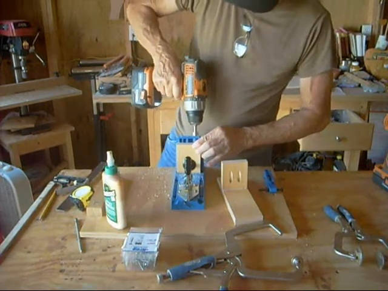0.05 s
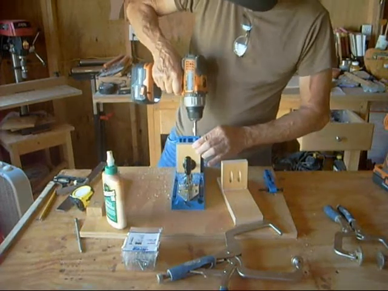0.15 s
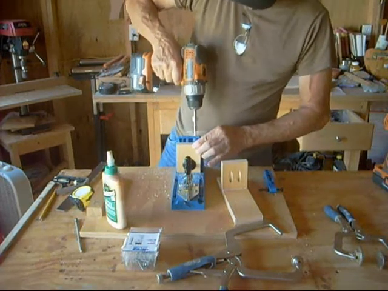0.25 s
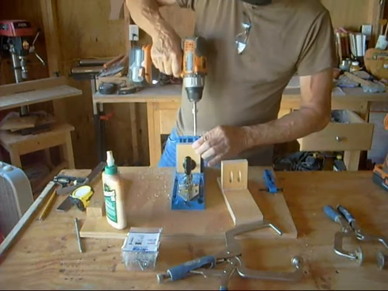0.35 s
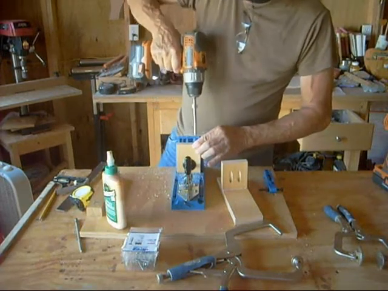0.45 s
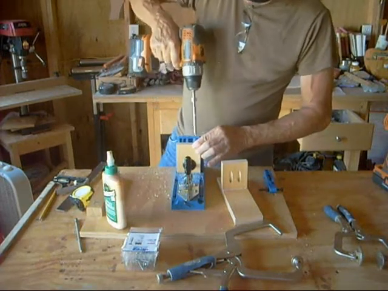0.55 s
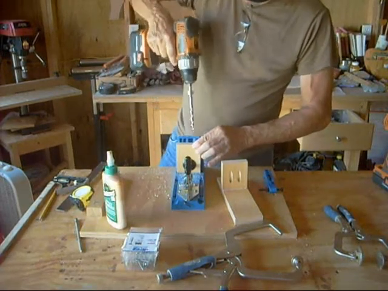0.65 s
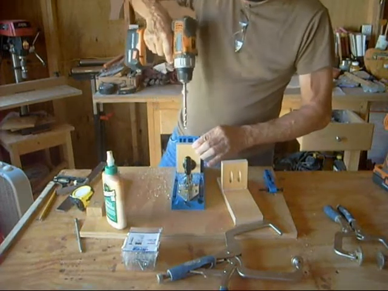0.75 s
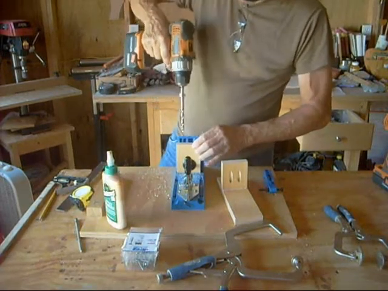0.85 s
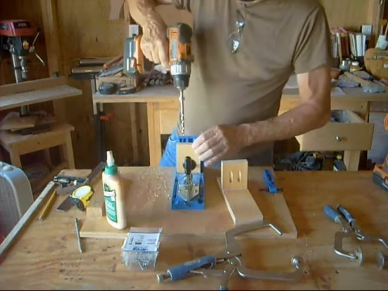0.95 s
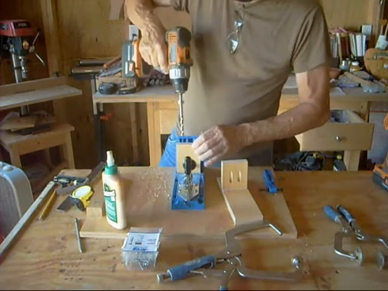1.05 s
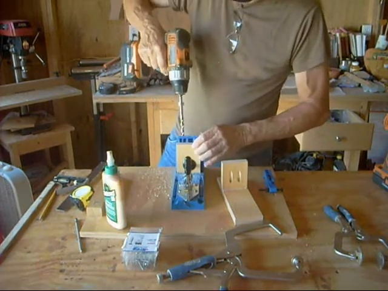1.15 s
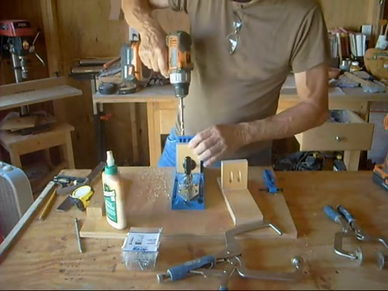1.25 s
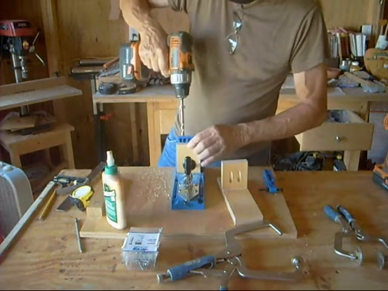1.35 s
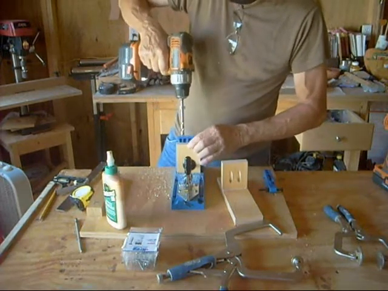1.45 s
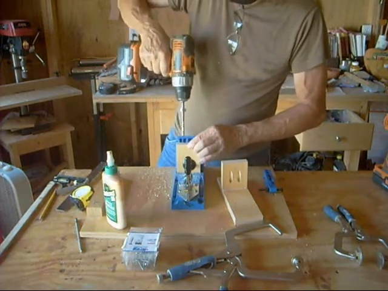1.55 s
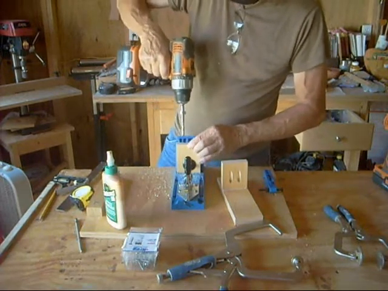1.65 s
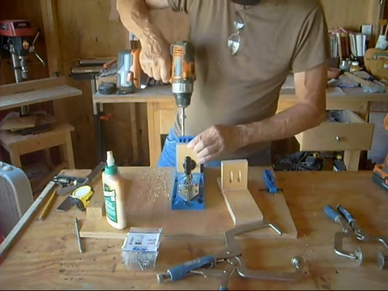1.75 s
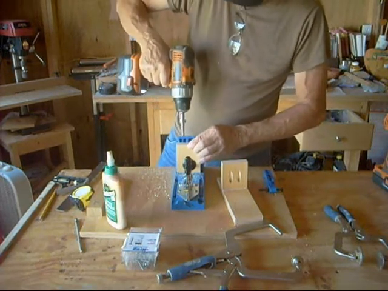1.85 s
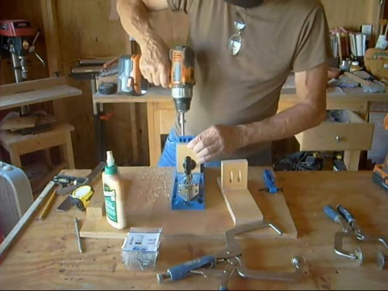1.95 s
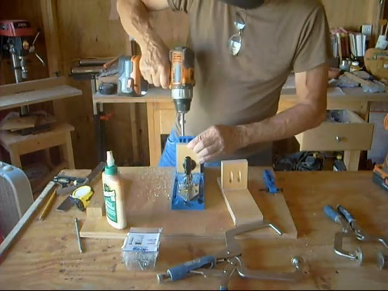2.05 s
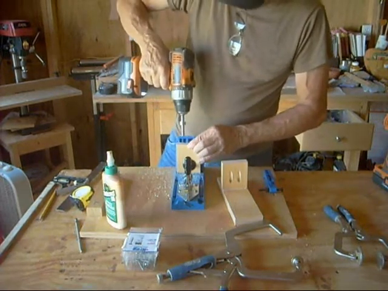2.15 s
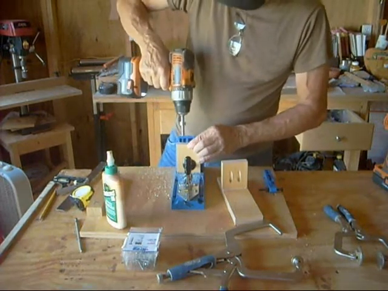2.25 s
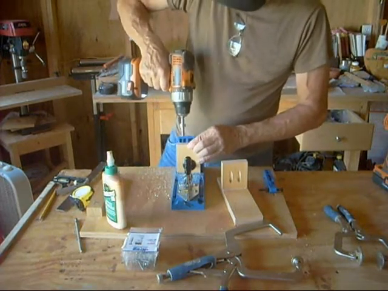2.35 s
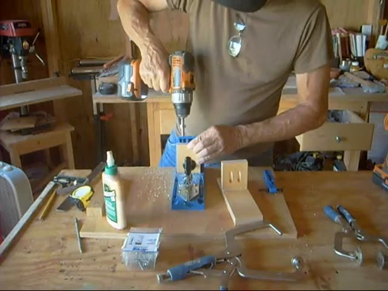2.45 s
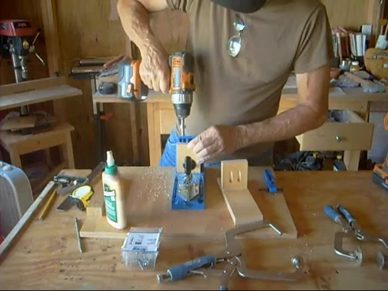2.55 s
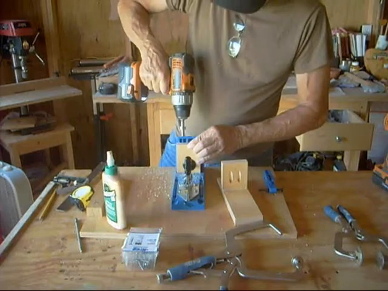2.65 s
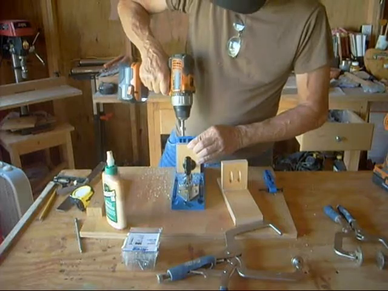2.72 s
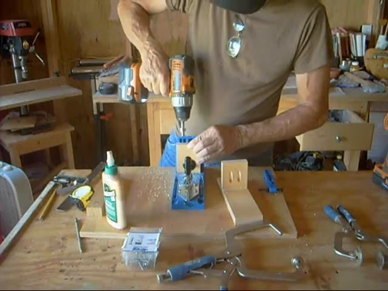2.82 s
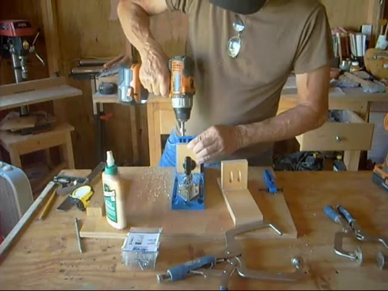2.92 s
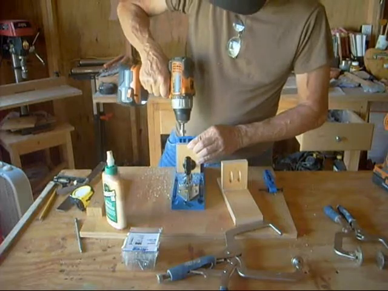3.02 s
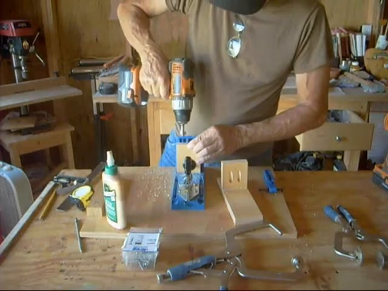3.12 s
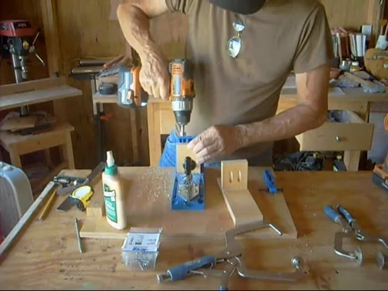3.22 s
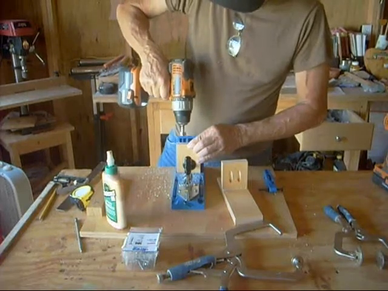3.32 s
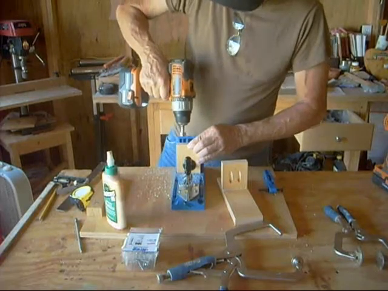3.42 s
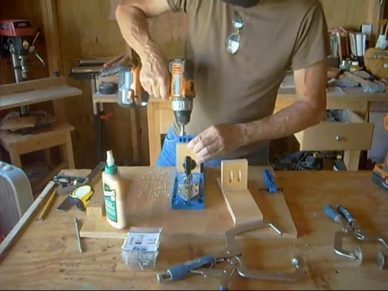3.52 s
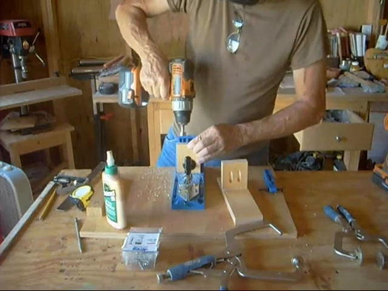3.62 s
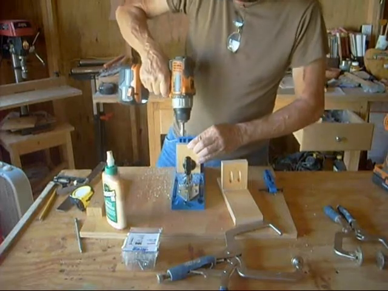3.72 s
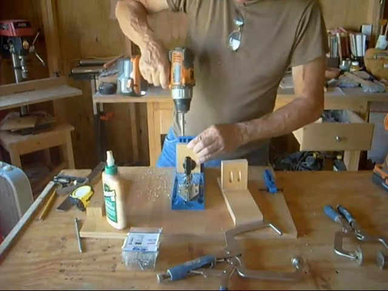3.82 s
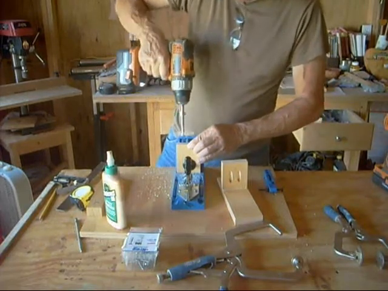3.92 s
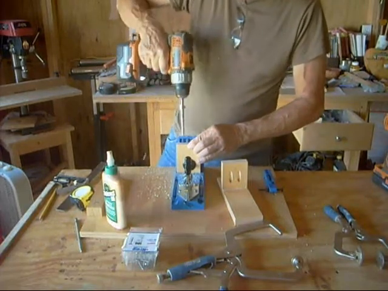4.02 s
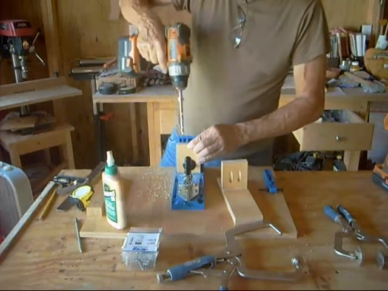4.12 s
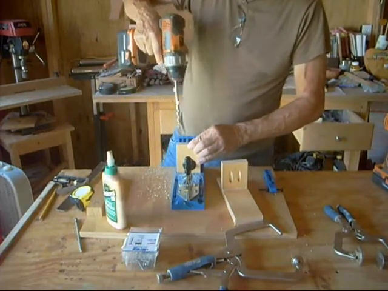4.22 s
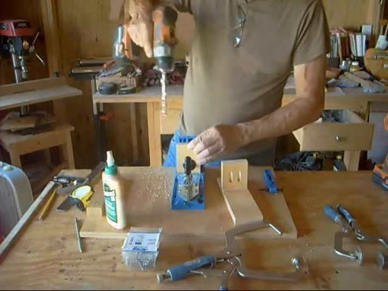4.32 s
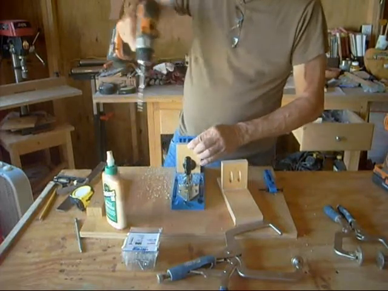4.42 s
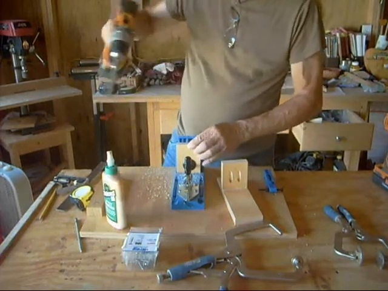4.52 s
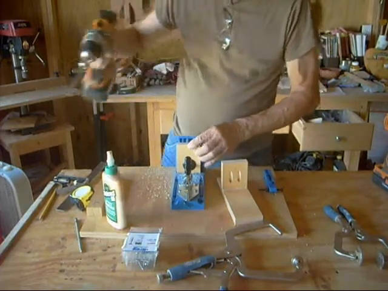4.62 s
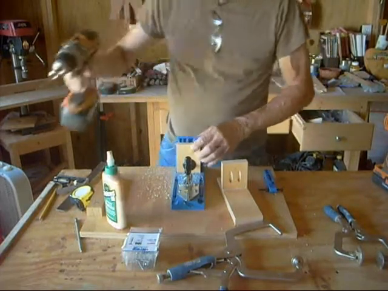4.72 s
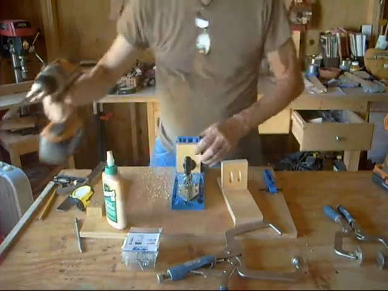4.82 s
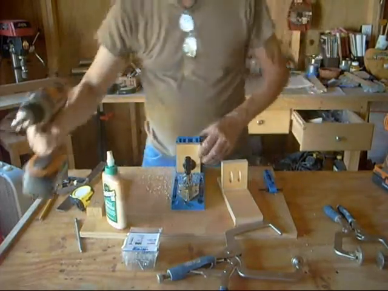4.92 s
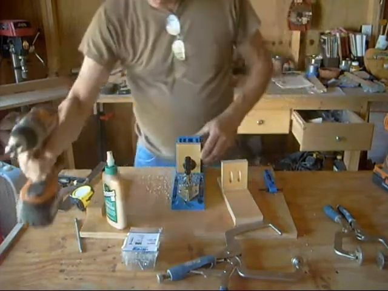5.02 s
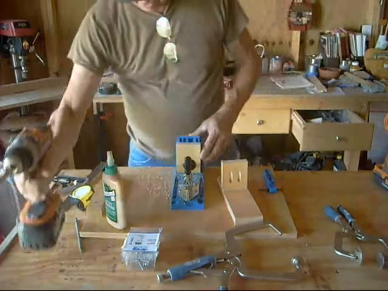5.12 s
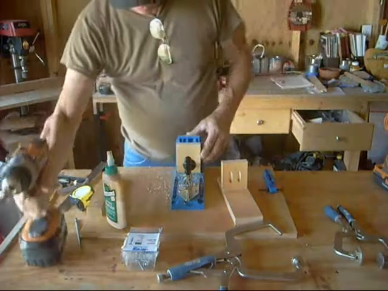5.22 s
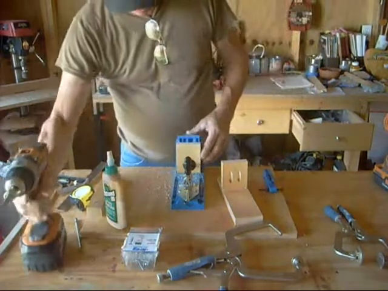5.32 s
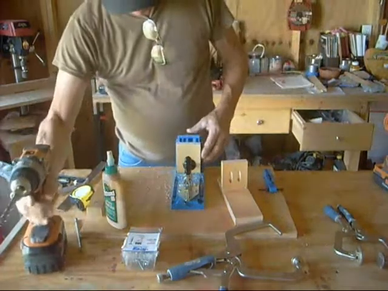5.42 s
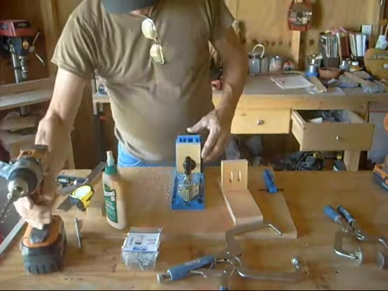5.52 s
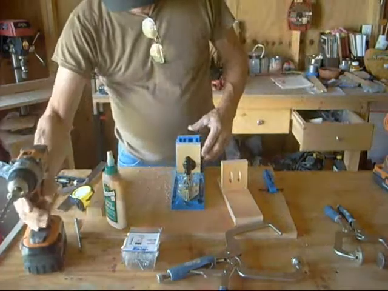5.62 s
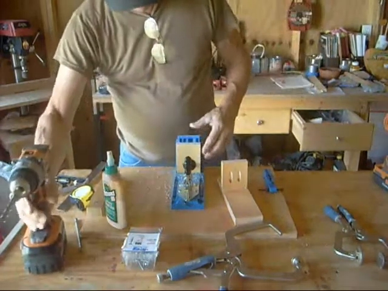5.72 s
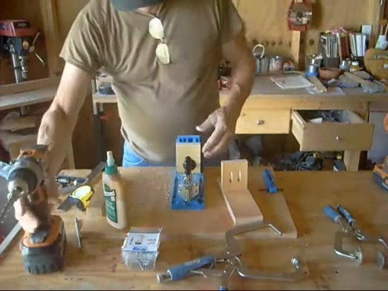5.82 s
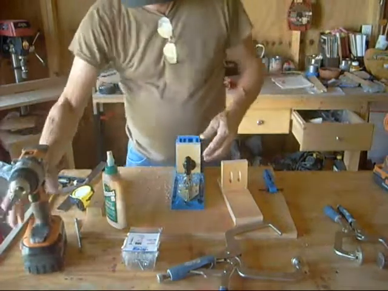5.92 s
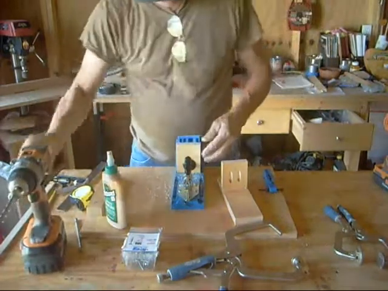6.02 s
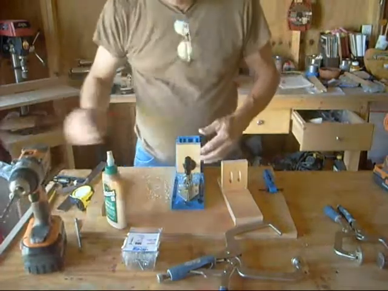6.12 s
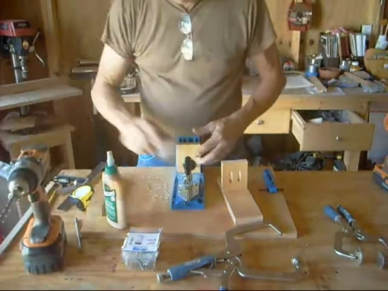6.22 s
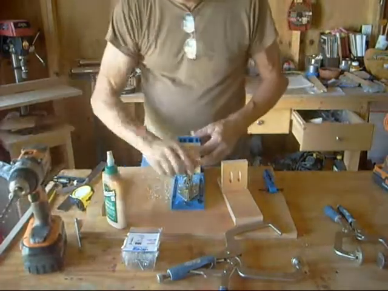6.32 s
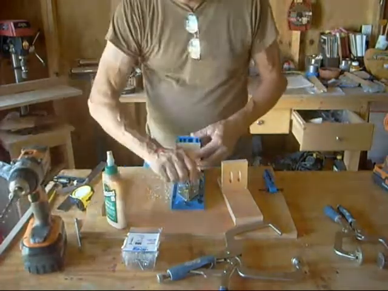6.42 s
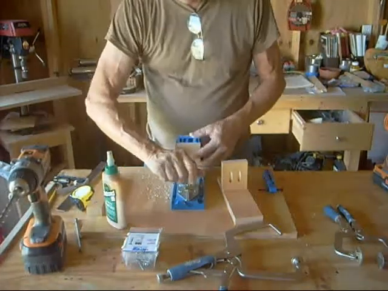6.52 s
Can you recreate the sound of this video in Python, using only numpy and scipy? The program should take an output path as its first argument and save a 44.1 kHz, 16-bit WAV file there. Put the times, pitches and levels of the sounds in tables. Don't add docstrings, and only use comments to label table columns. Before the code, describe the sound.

A cordless drill is running as the sound opens, a high gear whine over buzzing motor hum and grainy rush, rising slightly until about 0.5 s. It coasts down and brakes with a tight burst of metallic clicks at 0.6-0.7 s. In the quiet, the bit knocks into a guide around 1.05-1.2 s with small clicks and rubbing. At 1.5 s the drill runs up quickly, peaks near 1.9 s, then sags in pitch through 3.3 s as it bores, wood and jig humming roughly. The pitch climbs again to 4.0 s, then a sharp, overloaded rattle stops it around 4.15 s. A faint wavering squeak comes near 4.5 s. The drill lands with several knocks, a bright little ring and low bench shake at 5.3-5.45 s, followed by soft rubbing and tiny taps to 6 s. Faint hiss remains in the short-echo shop, with a bright, peaky microphone.

```python
import sys
import numpy as np
from scipy import signal
from scipy.fft import rfft, irfft, next_fast_len
from scipy.io import wavfile
from scipy.ndimage import uniform_filter1d, map_coordinates

SR = 44100
rng = np.random.default_rng(int(sys.argv[2]) if len(sys.argv) > 2 else 0)


def persist_wave(psi):
    counts = np.round(np.clip(psi, -1, 1) * 32767).astype(np.int16)
    wavfile.write(sys.argv[1], SR, np.atleast_2d(counts).T)


def gain_from_db(level_db):
    decades = np.asarray(level_db, float) / 20
    return 10 ** decades


N = 289296


def unit(x):
    return x / np.sqrt(np.mean(x ** 2) + 1e-20)


def along(points, hz):
    f, v = np.transpose(points)
    return np.interp(np.log(hz + 1), np.log(f + 1), v)


def curves(rows):
    s, *columns = np.transpose(rows)
    t = np.arange(N) / SR
    inside = (t >= s[0]) & (t <= s[-1])
    gate = uniform_filter1d(1. * inside, size=200)
    return [np.interp(t, s, column) for column in columns], gate


def swells(rows):
    t = np.arange(N) / SR
    total = 0
    for s, db, rise, fall in rows:
        total = total + gain_from_db(db - 60 * np.maximum((s - t) / abs(rise), (t - s) / abs(fall)))
    return total


def wobble(rate):
    knots = rng.standard_normal(int(N * rate / SR) + 4)
    return map_coordinates(knots, [np.arange(N) * rate / SR])


def filtered(x, response):
    m = next_fast_len(N + SR // 2)
    return irfft(rfft(x, m) * response(np.fft.rfftfreq(m, 1 / SR)), m)[:N]


def noise(points, grain_db, rate):
    source = gain_from_db(grain_db * wobble(rate)) * rng.standard_normal(N)
    return unit(filtered(source, lambda hz: gain_from_db(along(points, hz))))


def resonant(modes):
    def response(f):
        total = 0
        for k, (centre, width, db) in enumerate(modes):
            damping = 1j * f * width
            total = total + (-1) ** k * gain_from_db(db) * damping / (centre * centre - f * f + damping)
        return total
    return response


def causal(points):
    cepstrum = irfft(np.log(gain_from_db(along(points, np.fft.rfftfreq(4096, 1 / SR))) + 1e-4))
    cepstrum[1:2048] *= 2
    cepstrum[2049:] = 0
    pulse = irfft(np.exp(rfft(cepstrum)))[:2048]
    return pulse / np.abs(pulse).max()


def burst(t60, points, strike):
    t = np.arange(SR // 30) / SR
    chatter = gain_from_db(-60 * t / t60) * (1 - np.exp(-t / 0.001)) * rng.standard_normal(len(t))
    chatter[12] += strike
    sound = np.convolve(chatter, causal(points))[:len(t)]
    return sound / np.abs(sound).max()


# time in seconds, shaft speed in Hz.
MOTOR_RUNS = [
    [(0, 363), (.3, 396.5), (.44, 403.7), (.516, 402.5)],
    [(1.478, 62), (1.645, 285), (1.7, 352), (1.74, 376), (1.79, 389.5), (1.92, 396.2), (2.1, 391.8),
     (2.45, 375.3), (2.9, 358.7), (3.33, 353), (3.41, 365.5), (3.63, 376.5), (3.85, 394.3), (4.025, 404.5)],
]


def drill(run):
    speeds = stopping(run)
    (shaft_hz,), gate = curves(speeds)
    t = np.arange(N) / SR
    slow = np.log2(np.minimum(shaft_hz / 335, 1)) * (t < run[-1][0])
    bite_db = 8 * np.exp(np.minimum(t - speeds[-1][0], 0) / .012)
    feed_db, = curves(FEED)[0]
    turns = 2 * np.pi * np.cumsum(shaft_hz * (1 + .0015 * wobble(40))) / SR
    tones = whine(shaft_hz, turns, bite_db) + shaft_orders(shaft_hz, turns, slow, bite_db)
    air = gear_rush(feed_db, slow, bite_db) + fan(slow, bite_db)
    return tones * gate, air * gate + cutting(shaft_hz, feed_db, slow, gate)


def stopping(run):
    coast_s, coast_hz_per_s = .088, 350
    brake_s, brake_hz_per_s = .033, 3700
    s, hz = run[-1]
    coasted = hz - coast_hz_per_s * coast_s
    braked = coasted - brake_hz_per_s * brake_s
    return run + [(s + coast_s, coasted), (s + coast_s + brake_s, braked)]


# shaft speed in Hz, level in dB.
WHINE_LEVEL = [(100, -59), (215, -35.5), (290, -45.5), (335, -35), (372, -36), (384, -40), (396, -41.5),
               (404, -37)]


def whine(shaft_hz, turns, bite_db):
    level_db = along(WHINE_LEVEL, shaft_hz) - 1.4 * bite_db
    mesh = np.sin(15 * turns) + gain_from_db(-32.5) * np.sin(2 * 15 * turns)
    return gain_from_db(level_db + 3.5 + 2.1 * wobble(60) + 1.8 * wobble(14)) * mesh


# shaft speed in Hz, level in dB.
FOURTH_LEVEL = [(250, -35), (354, -38.5), (363, -33), (373, -45.5), (384, -28.5), (390.5, -39.5),
                (395, -31.5), (404, -35)]
# multiple of the shaft speed, level in dB against the fourth order.
FAINT_ORDERS = [(1, -13.5), (2, -20), (3, -17.5), (5, -14.5), (6, 0), (10, -8.5), (16, -25.5), (17, -20.5)]


def shaft_orders(shaft_hz, turns, slow, bite_db):
    fourth_db = along(FOURTH_LEVEL, shaft_hz) + 28.5 * slow
    tones = gain_from_db(fourth_db + 3 + 1.5 * wobble(30)) * np.sin(4 * turns)
    smooth_db = uniform_filter1d(fourth_db, size=8000)
    for order, db in FAINT_ORDERS:
        level_db = smooth_db + db - 1 - 2 * bite_db + 12 * slow + 4 * wobble(12)
        tones += gain_from_db(level_db) * np.sin(np.round(order) * turns)
    return tones


# frequency in Hz, density in dB per Hz.
GEAR_CASE = [(290, -38.5), (500, -20.5), (720, -20.5), (804, -19.5), (1040, -12), (1350, -8.5),
             (1530, -6.5), (2010, -4), (2710, 3.5), (3130, 2), (5030, -18.5), (5490, -19.5), (7000, -44),
             (9100, -66), (15400, -120)]


def gear_rush(feed_db, slow, bite_db):
    level_db = -21 + 0.18 * (feed_db + 41.5) + 10.5 * slow + bite_db
    return gain_from_db(level_db + 0.45 * wobble(22)) * noise(GEAR_CASE, grain_db=0.5, rate=700)


# frequency in Hz, density in dB per Hz.
FAN_COLOUR = [(3650, -21), (6200, -5), (6270, -2.5), (7480, -10.5), (11000, -20.5), (14300, -52),
              (22000, -120)]


def fan(slow, bite_db):
    level_db = -44 + 18 * slow + 0.76 * bite_db
    return gain_from_db(level_db + 0.57 * wobble(12)) * noise(FAN_COLOUR, grain_db=0.5, rate=500)


# time in seconds, cutting level in dB.
FEED = [
    (0, -35),
    (.48, -43),
    (.57, -49.5),
    (1.5, -48.5),
    (1.8, -41),
    (2.3, -33.5),
    (3.3, -33.5),
    (3.65, -35),
    (4.0, -42),
    (4.14, -54.5),
]
# centre in Hz, width in Hz, level in dB.
BENCH_MODES = [(93, 50, -19), (127, 12, -2), (144.5, 12, 1.5), (179, 110, -8.5), (247, 60, -5),
               (347, 41, -1), (529, 110, -9), (700, 120, -6.5), (1010, 340, -11)]
# centre in Hz, width in Hz, level in dB.
JIG_MODES = [(135, 25, -9.5), (312.2, 7.7, 6.5), (401, 56, -2), (442.6, 40, 2.5), (606, 45, -3),
             (1061, 160, -13)]


def cutting(shaft_hz, feed_db, slow, gate):
    level_db = feed_db + slow + 2.5 * wobble(9) - 3
    chips = gain_from_db(1.2 * wobble(60)) * rng.standard_normal(N) * gate
    jig_db = 2.5 - 0.38 * np.abs(shaft_hz - 352)
    body = filtered(chips, resonant(sorted(BENCH_MODES + JIG_MODES[2:])))
    body = body + gain_from_db(jig_db) * filtered(chips, resonant(JIG_MODES[1:2]))
    return gain_from_db(level_db) * unit(body) * np.sqrt(gate.mean())


# time in seconds, peak in dB.
LOCK_CLICKS = [(.6145, -12), (.6305, -14), (.6388, -7), (.6455, -4), (.6545, -11), (.663, -4), (.672, -11),
               (.6815, -16), (.692, -17), (1.1245, -50), (1.4815, -40), (1.4935, -36), (4.1305, -10),
               (4.1512, 2), (4.1588, -2), (4.1728, -4), (4.186, -10)]


def lock():
    case = [(300, -47.5), (1200, -22.5), (2200, -13.5), (3000, 1.0), (3700, -14.0), (5000, -23.5),
            (7000, -38), (11000, -56.0), (12000, -93)]
    out = np.zeros(N + SR)
    for s, db in LOCK_CLICKS:
        click = burst(0.0037, case, strike=1.9)
        out[round(s * SR):][:len(click)] += gain_from_db(db) * click
    return out[:N]


# time in seconds, peak in dB, thud in dB against the peak,
# bit ring in dB against the peak, bit ring in Hz.
KNOCKS = [(1.0574, -55.5, -25, -26, 6820), (1.1329, -22.5, -4, -43, 5840), (1.1489, -22.5, -6.5, -37, 5940),
          (1.1839, -22.5, -17.5, -21, 6100), (1.2055, -30.5, -11, -14, 5960),
          (4.7344, -45.5, -18, -29, 6680), (5.3013, -17, -9, -38, 5700), (5.315, -31.5, 9.5, -27, 6500),
          (5.3257, -27.5, -13, -15.5, 6650), (5.4009, -24, -13, -35, 6410), (5.4145, -31.5, -2, -34, 6560),
          (5.4404, -32.5, -1, -15, 6650), (5.5236, -46, 4.5, -38, 6240), (5.6296, -46, -7.5, -32, 6240),
          (5.9414, -50, -20, -25.5, 6020), (5.9833, -49.5, -22.5, -26, 5900)]
# frequency in Hz, level in dB, 60 dB decay in seconds.
CHUCK_STEEL = [
    (8650, -22, .06),
    (10020, -2.5, .12),
]
# centre in Hz, width in Hz, level in dB.
BATTERY_SHELL = [(1560, 260, -12.5), (2260, 600, -12)]


def knocks():
    contact = [(300, -14), (1200, -7.5), (2400, -9.5), (3300, -2.0), (4200, -20.5), (6000, -34),
               (11000, -49.5), (12000, -87.5)]
    t = np.arange(SR // 5) / SR
    clicks, on_jig, on_edge, on_bench, rings = np.zeros((5, N + SR))
    soft = 1 - np.exp(-t / .0008)
    for s, db, thud_db, bit_db, bit_hz in KNOCKS:
        at = round(s * SR)
        click = burst(0.0134, contact, strike=4.4)
        clicks[at:][:len(click)] += gain_from_db(db + 1.0) * click

        wood = on_jig if s < 2 else on_edge if s < 5.39 else on_bench
        wood[at:][:len(t)] += gain_from_db(db + thud_db + 25.0 - 60 * t / 0.034) * rng.standard_normal(len(t))
        wood[at] += gain_from_db(db + thud_db + 39)

        chuck_db = bit_db + (-9 if round(10 * s) == 53 else -24)
        ring = gain_from_db(bit_db + 3.5 - 60 * t / 0.013) * np.sin(2 * np.pi * bit_hz * t)
        for hz, level_db, t60 in CHUCK_STEEL:
            ring += gain_from_db(chuck_db + level_db + 1.5 - 60 * t / t60) * np.sin(2 * np.pi * hz * t)
        rings[at:][:len(t)] += gain_from_db(db) * ring * soft
    thuds = filtered(on_jig[:N], resonant(JIG_MODES))
    thuds += filtered(on_bench[:N], resonant(BENCH_MODES + BATTERY_SHELL))
    thuds += gain_from_db(5) * filtered(on_bench[:N], resonant([(125, 40, 0)]))
    thuds += gain_from_db(-4.0) * filtered(on_edge[:N], resonant(BENCH_MODES[3:] + BATTERY_SHELL))
    thuds = filtered(thuds, lambda f: 1 / (1 + 1j * f / 2200) ** 2)
    return clicks[:N], thuds, rings[:N]


# time in seconds, squeak pitch in Hz, level in dB.
SQUEAK_GLIDE = [
    (4.4, 2900, -72),
    (4.46, 2920, -63),
    (4.5, 2980, -59),
    (4.525, 3000, -52),
    (4.55, 2960, -58),
    (4.59, 2910, -57),
    (4.61, 2940, -67),
    (4.72, 2950, -76),
]


def squeak():
    (hz, db), gate = curves(SQUEAK_GLIDE)
    tone = np.zeros(N)
    for ratio, strand_db in [(.5, -31), (.9, -12.5), (1, -1), (1.1, -10), (1.43, -21)]:
        waver = 1 + .02 * wobble(300) + .004 * wobble(20)
        turns = 2 * np.pi * np.cumsum(ratio * hz * waver) / SR
        tone += gain_from_db(strand_db + 3 * wobble(45)) * np.sin(turns)
    return gain_from_db(db + 6.0) * tone * gate


# peak time in seconds, level in dB,
# 60 dB rise in seconds, 60 dB fall in seconds (signs are ignored).
RUBS = [(.95, -66, .3, 0.5), (1.06, -62, -0.1, .8), (1.135, -40.5, -0.05, 0.2), (1.21, -46, .2, 0.17),
        (1.272, -43.5, 0.35, 0.42), (4.386, -56.5, 1, 1.2), (4.52, -62, 1.1, .5), (5.305, -32.5, 0, 0.34),
        (5.41, -47, .03, -0.3), (5.524, -45.5, 0.25, 0.46), (5.86, -55, .55, 1.0)]
# frequency in Hz, density in dB per Hz.
CLOTH_COLOUR = [(180, -38.5), (300, -9.5), (628, -24.5), (1090, -9.5), (1400, -2), (1580, -6), (3090, 4.5),
                (4900, -22.5), (7000, -32), (9100, -55.5), (15400, -120)]


def rustle():
    return gain_from_db(-2.5) * swells(RUBS) * noise(CLOTH_COLOUR, grain_db=3, rate=200)


# frequency in Hz, 60 dB decay in seconds.
SHOP_DECAY = [(150, 0.48), (500, 0.48), (2500, 0.3), (10000, 0.31)]


def shop(x, count=18):
    wet, step = np.zeros(N + 2 * SR), N // count + 1
    hz, t, z = signal.stft(rng.standard_normal((count, SR * 3 // 4)), SR, nperseg=256)
    decay = gain_from_db(-60 * t / along(SHOP_DECAY, hz)[:, None])
    tails = signal.istft(z * decay, SR, nperseg=256)[1]
    for k, tail in enumerate(tails):
        answer = signal.fftconvolve(x[k * step:][:step], tail / np.linalg.norm(tail))
        wet[k * step + 200:][:len(answer)] += answer
    return wet[:N]


# peak time in seconds, level in dB,
# 60 dB rise in seconds, 60 dB fall in seconds.
GUSTS = [
    (1.15, -61.5, .3, 2),
    (1.92, -54.5, .5, 0.92),
    (2.25, -52.5, 1.6, 1.2),
    (2.72, -57.5, 1.5, 0.66),
    (3.27, -60, .9, 1.1),
    (5.305, -49.5, .03, .6),
    (5.42, -40, 0.11, 0.57),
]


def draught():
    running = sum(uniform_filter1d(curves(stopping(run))[1], size=8000) for run in MOTOR_RUNS)
    strength = gain_from_db(-80.5) + gain_from_db(-68) * running + swells(GUSTS)
    rumble = [(12, -39.0), (25, -5.0), (55, 0.0), (80, -12), (140, -58.5)]
    return strength * gain_from_db(-3.5) * noise(rumble, grain_db=5.0, rate=8)


# frequency in Hz, density in dB per Hz.
STILL_SHOP = [(15, -44.5), (25, -10.5), (69, -2.5), (149, -11.5), (353, -9), (381, -17.5), (422, -5.5),
              (505, -13.5), (545, -13), (1800, -10), (2100, -11), (2930, -7), (4070, -19.5), (11000, -25.5),
              (14300, -48.5), (22000, -120)]


def still_air():
    electronics = [(7000, -67.5), (7200, -1), (7450, -6.5), (7700, -64)]
    microphone = [(2500, -40.0), (2800, -6.0), (2900, 0), (3050, -2.5), (3400, -38.5)]
    still = gain_from_db(-63.5) * noise(STILL_SHOP, grain_db=0.5, rate=100)
    still += gain_from_db(-84.5) * noise(electronics, grain_db=-0.3, rate=110)
    still += gain_from_db(-75.5) * noise(microphone, grain_db=0.5, rate=30)
    return still


def scene():
    tones_a, rush_a = drill(MOTOR_RUNS[0])
    tones_b, rush_b = drill(MOTOR_RUNS[1])
    clicks, thuds, rings = knocks()
    tones = tones_a + tones_b + squeak()
    rush = rush_a + rush_b
    hits = lock() + clicks
    wet = shop(gain_from_db(-6.5) * tones + gain_from_db(-7.5) * rush + gain_from_db(-0.5) * hits + gain_from_db(-3.0) * thuds)
    direct = tones + rings + rush + hits + thuds
    return (direct + wet + rustle() + draught() + still_air())[None]


def band_limit(x):
    return signal.sosfilt(signal.butter(12, 16720, fs=SR, output="sos"), x)


def record(dry):
    clipped = np.clip(dry[0], -1, 1)
    low = filtered(clipped, lambda hz: hz < SR / 4)
    mirror = low * (-1.) ** np.arange(N)
    slope = [(11000, 0.0), (13000, -1.5), (15400, -5.5), (15650, -39.5), (17000, -69)]
    image = filtered(mirror, lambda hz: gain_from_db(along(slope, hz)))
    return band_limit(np.clip(low + image, -1, 1)[None])


dry = scene()
out = record(dry)
persist_wave(out)
```